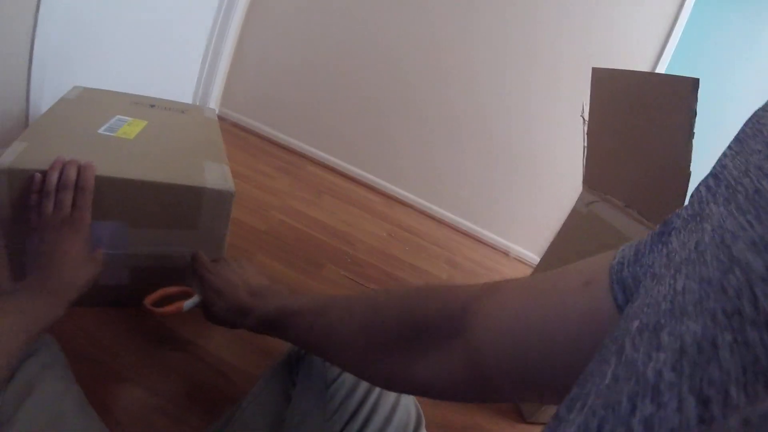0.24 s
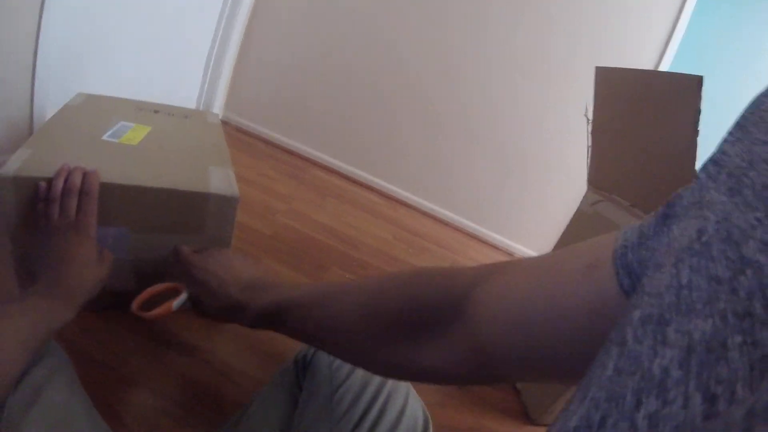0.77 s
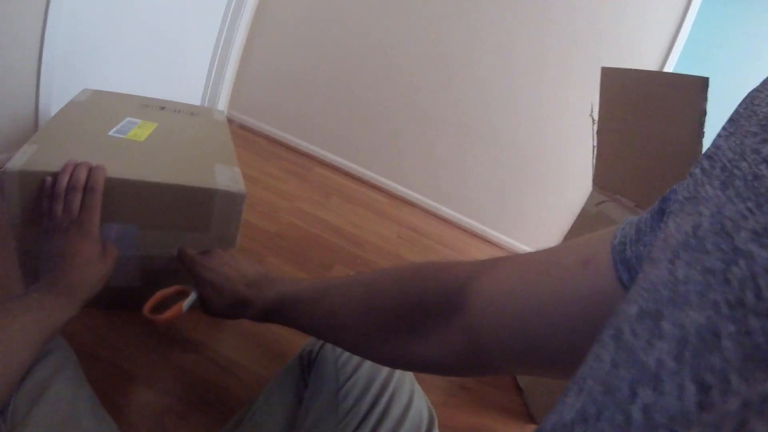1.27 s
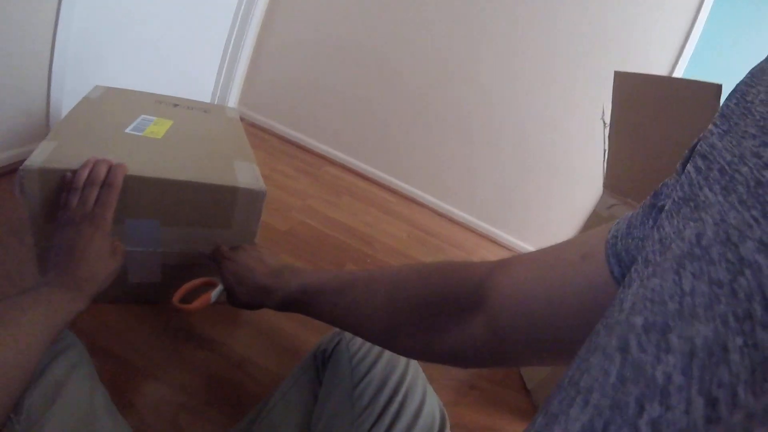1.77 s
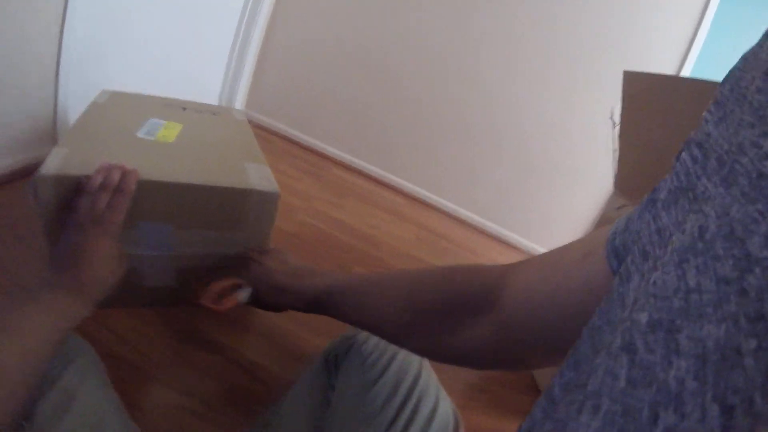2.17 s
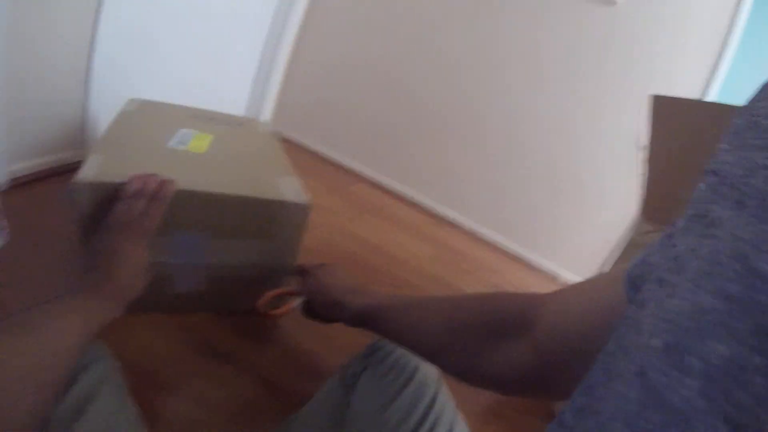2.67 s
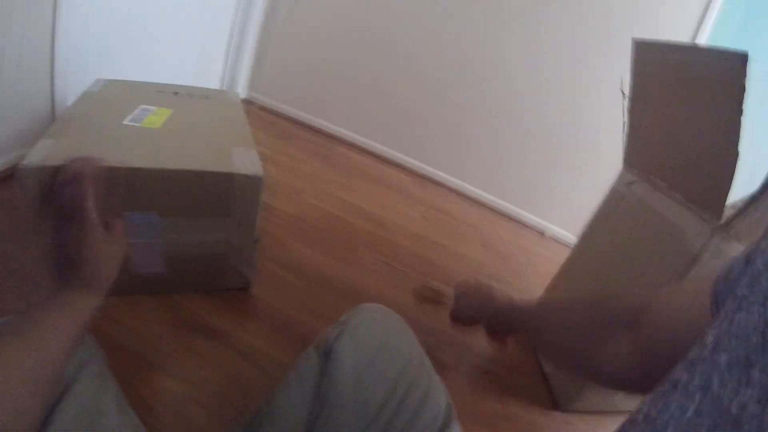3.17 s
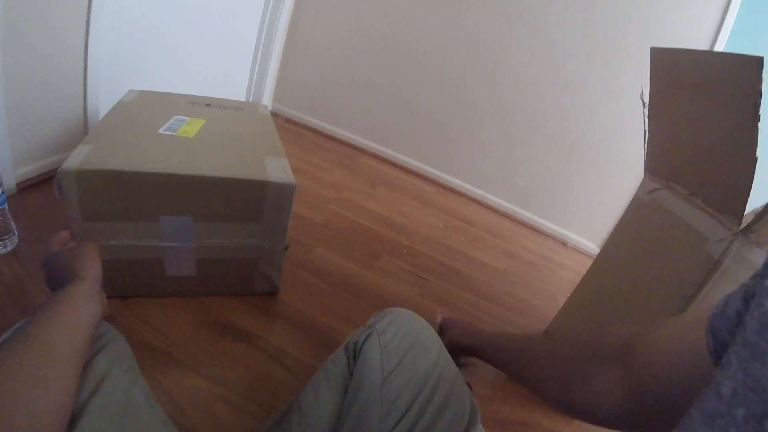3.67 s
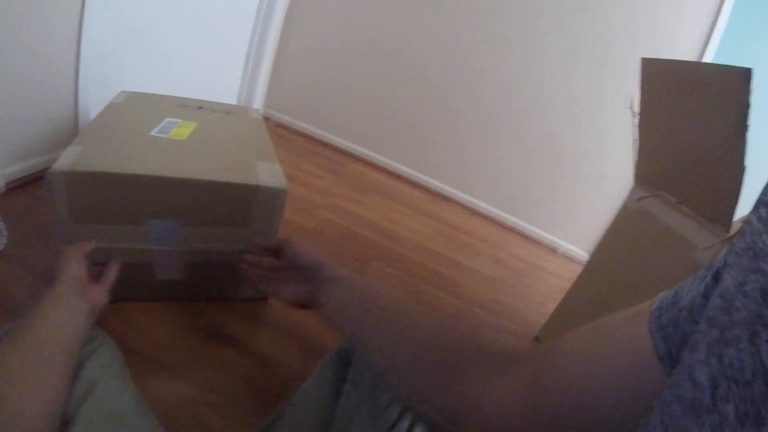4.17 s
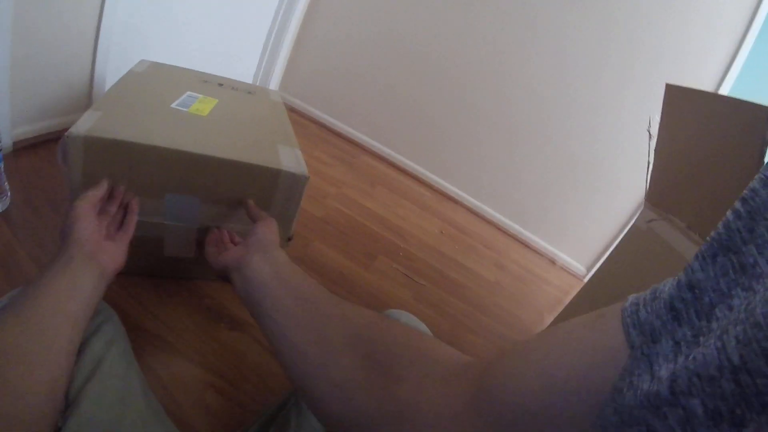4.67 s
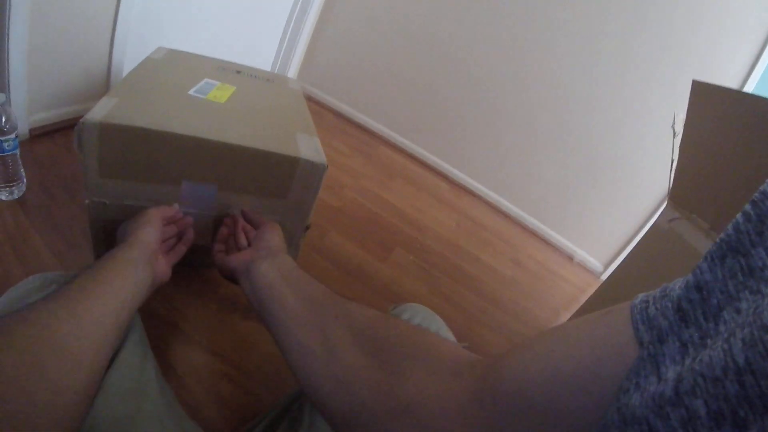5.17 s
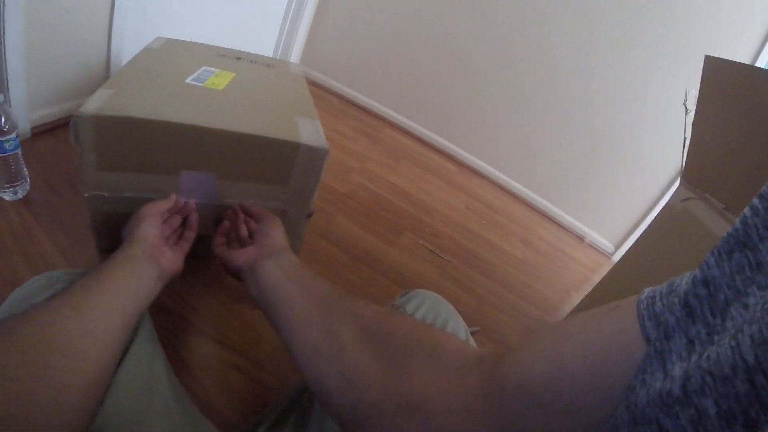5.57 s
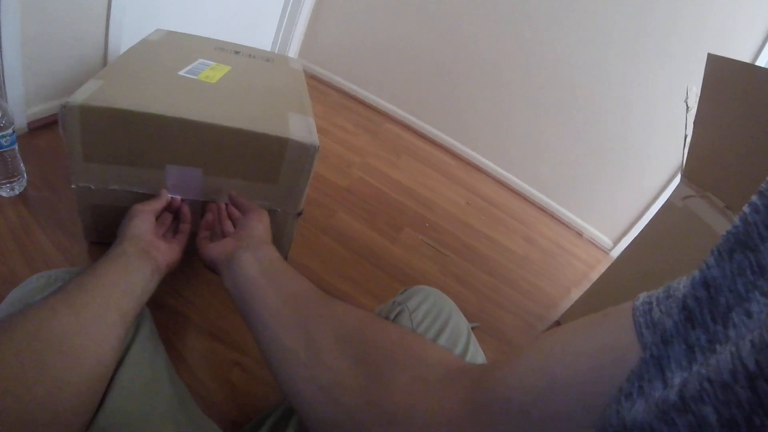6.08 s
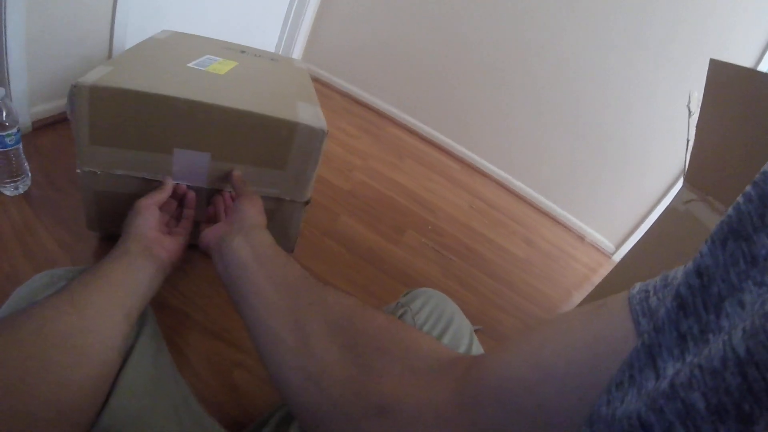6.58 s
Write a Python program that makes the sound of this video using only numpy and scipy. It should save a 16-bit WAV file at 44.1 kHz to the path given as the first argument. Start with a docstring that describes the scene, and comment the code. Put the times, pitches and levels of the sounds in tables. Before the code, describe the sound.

Scissors push along the packing tape of a cardboard box in short, rasping strokes, with sharp little cracks and dull bumps from the box. After a brief lull comes a louder knock and scrape as the scissors are put down and the hands shift. Fingers then rub and pick at the tape, which snaps in tiny tears. It sounds close, in a small, quiet room with a short echo.

```python
"""A small room with a wooden floor, where scissors are pushed along the packing tape of a cardboard box.
The blade sticks and slips, scraping and tearing the tape in short strokes while the box bumps.
Then the scissors are put down and fingers rub and pick at the tape, which snaps in bursts of tiny
tears, and the cardboard panels knock dully. Short room echoes and a quiet hush surround it all."""
import sys
import numpy as np
from scipy import signal
from scipy.fft import rfft, irfft
from scipy.io import wavfile

SR = 44100
rng = np.random.default_rng(int(sys.argv[2]) if len(sys.argv) > 2 else 0)


def unload_wav(signal):
    """Save mono or channel-first audio to the path in sys.argv[1] as 16-bit WAV at rate SR, clipped to [-1, 1]."""
    wavfile.write(
        sys.argv[1],
        SR,
        np.round(np.clip(np.atleast_2d(signal).T, -1, 1) * 32767).astype(np.int16),
    )


N = 301630


def from_db(db):
    """Decibels to gain."""
    return 10 ** (np.asarray(db) / 20)


def unit_rms(x):
    """Scale to unit power."""
    return x / np.sqrt(np.mean(x ** 2) + 1e-20)


def add(track, start_s, sound):
    """Mix a sound into a track at its cue."""
    at = int(np.clip(round(start_s * SR), 0, N - 1))
    track[at:at + len(sound)] += sound[:N - at]


def equalise(x, curve, size=8192):
    """Minimum-phase EQ that follows a curve of (Hz, dB) points."""
    hz, db = np.transpose(curve)
    grid = np.maximum(np.fft.rfftfreq(size, 1 / SR), 1)
    gain = from_db(np.interp(np.log(grid), np.log(hz), db))
    cepstrum = irfft(np.log(gain))
    cepstrum[1:size // 2] *= 2
    cepstrum[size // 2 + 1:] = 0
    impulse = irfft(np.exp(rfft(cepstrum)))
    return signal.fftconvolve(x, impulse)[:len(x)]


def resonate(x, hz, width_hz):
    """One resonant band with unity gain at its peak."""
    r = np.exp(-np.pi * width_hz / SR)
    feedback = [1, -2 * r * np.cos(2 * np.pi * hz / SR), r * r]
    return signal.lfilter(np.array([1, 0, -1]) * (1 - r * r) / 2, feedback, x + 1e-18)


def drift(turns_per_s):
    """A control signal of unit power that glides between random values."""
    position = np.arange(N) / SR * turns_per_s
    return unit_rms(np.interp(position, np.arange(N), rng.standard_normal(N)))


def decay(t, t60):
    """An exponential tail, 60 dB down after t60 seconds."""
    return np.exp(-np.log(1000) * t / t60)


# Tone of the quiet room and its hiss. Each row: frequency in Hz, gain in dB.
HUSH_EQ = [(20, 2), (45, 4), (110, -12.5), (380, -12), (520, -17), (800, -19), (1300, -25), (2200, -27.5),
           (4000, -35), (6000, -32.5), (7000, -26.5), (9000, -33), (11000, -37.5), (14500, -44)]


def hush(air_db=-52.5, waver_db=-1.5, hiss_db=-71, hiss_hz=6520, width_hz=450):
    """A bed of gently wavering room rumble and microphone hiss with one narrow, steep peak."""
    air = unit_rms(equalise(rng.standard_normal(N), HUSH_EQ))
    air *= from_db(waver_db * drift(turns_per_s=1.37))
    hiss = resonate(rng.standard_normal(N), hiss_hz, width_hz)
    hiss = resonate(hiss, hiss_hz, width_hz)  # a second pass steepens the peak
    return from_db(air_db) * air + from_db(hiss_db) * unit_rms(hiss)


# Resonances of taut tape and blade. Each row: frequency in Hz, width in Hz, gain in dB.
TAPE_RESONANCES = [(2150, 240, -13), (3650, 550, -3.5), (4730, 680, 0.5), (6360, 290, 2)]


def through_tape(x):
    """Tape and blade add their narrow resonances to whatever excites them."""
    return x + sum(from_db(db) * resonate(x, hz, width) for hz, width, db in TAPE_RESONANCES)


# Tape cracks and blade ticks. Each row: start in seconds, level in dB before the crack's trim,
# pitch in Hz, cardboard thud in dB against that level.
TAPE_SNAPS = [(0.2122, -46, 2420, -10), (1.0303, -44.5, 5700, 12), (1.222, -46.5, 4900, -12),
              (1.8432, -28, 5100, 1), (1.9775, -43.5, 6240, 1), (2.0211, -22.5, 6700, -34),
              (2.1756, -39.5, 5800, 7), (2.2089, -40, 2520, 11), (2.2388, -34.5, 6500, 6),
              (2.283, -24, 6340, -3), (2.5022, -36, 5070, 10.5), (2.5985, -17.5, 4830, -5),
              (2.865, -23, 4800, 0), (2.8719, -13.5, 5670, -22), (3.3615, -38.5, 4250, -17),
              (3.8806, -30, 4900, 1), (3.9065, -29, 6000, 4), (3.9377, -18, 1650, -1),
              (3.9447, -19, 4180, 3), (4.2233, -34.5, 3600, -8), (4.6387, -42, 2250, -4),
              (5.4758, -25, 5000, -1), (5.5388, -39.5, 5750, 1), (5.5439, -39, 5830, 5),
              (5.6177, -39, 2680, -6), (5.7379, -24.5, 6740, -2), (5.7449, -29.5, 7100, 1),
              (5.9446, -37.5, 5000, 1), (6.0977, -28, 4350, 2), (6.1782, -39, 2290, -9),
              (6.23, -27, 5700, -1.5), (6.2836, -37, 2280, -15), (6.321, -42, 4700, 3),
              (6.3416, -43, 4700, 5), (6.3595, -32, 5150, -1), (6.389, -18.5, 3530, -11),
              (6.7557, -21.5, 4330, -3), (6.7706, -28.5, 2460, 1), (6.7793, -29, 5700, 9.5)]
# Tone of a crack. Each row: frequency in Hz, gain in dB.
CRACK_EQ = [(250, 2), (600, 7.5), (1000, 10), (1550, -8.5), (2400, 7), (3500, -3.5), (4100, -2), (4800, 0),
            (6700, 0.5), (8700, -3.5), (11000, -19.5), (14500, -21)]


def tape_snaps(rise_s=0.00027, t60=0.012, width_hz=1800, broadband_db=-8, trim_db=-7,
               thud_hz=760, thud_t60=0.0063):
    """A snap is a burst of tiny tears lasting milliseconds; it also tugs the cardboard beneath."""
    cracks, thuds = np.zeros(N), np.zeros(N)
    t = np.arange(SR // 20) / SR
    attack = 1 - np.exp(-t / rise_s)
    envelope = attack * decay(t, t60)
    envelope /= envelope.max()
    thud = np.sin(2 * np.pi * thud_hz * t) * attack * decay(t, thud_t60)
    for start_s, db, hz, thud_db in TAPE_SNAPS:
        tears = rng.standard_normal(len(t)) * envelope
        burst = resonate(tears, hz, width_hz) + from_db(broadband_db) * tears
        crack = unit_rms(equalise(burst, CRACK_EQ)) * np.sqrt(np.mean(envelope ** 2))
        add(cracks, start_s, from_db(db) * crack)
        add(thuds, start_s, from_db(db + thud_db) * thud)
    return from_db(trim_db) * through_tape(cracks) + thuds


# Modes of the box panels. Each row: frequency in Hz, relative level in dB, T60 in seconds.
PANEL_MODES = [(80.3, -16.5, 0.18), (159, -52, 0.098), (209.8, -28.5, 0.19), (242.7, -26.5, 0.15),
               (429, -25.5, 0.18), (512, -33.5, 0.078), (667, -18.5, 0.08), (730, -54, 0.02),
               (1005, -42.5, 0.012)]


def box_ring(push, gain_db=-33):
    """The panels ring on after each push."""
    t = np.arange(SR // 4) / SR
    ring = sum(from_db(db) * np.sin(2 * np.pi * hz * t) * decay(t, t60) for hz, db, t60 in PANEL_MODES)
    return from_db(gain_db) * signal.fftconvolve(push, ring)[:N]


# Bumps of the cardboard. Each row: start in seconds, level in dB, pitch of the struck panel in Hz,
# crunch in dB against that level.
BOX_KNOCKS = [(0.213, -25.5, 410, -13), (0.342, -31.5, 387, -15), (0.756, -34.5, 390, 0),
              (0.765, -24.5, 350, -12), (0.788, -26, 337, -9), (0.819, -25.5, 830, -22),
              (0.823, -23, 328, -9), (1.032, -31, 254, -12.5), (1.208, -29.5, 383, -24),
              (1.406, -34.5, 228, -5), (1.842, -17, 244, 2), (1.848, -10.5, 448, -14),
              (2.022, -27, 320, -13), (2.028, -21, 350, -22), (2.24, -26, 400, -3),
              (2.283, -22.5, 417, 0.5), (2.643, -22, 262, -12), (2.871, -12, 246, -3),
              (3.36, -25, 353, -18), (3.379, -32, 240, -15), (3.728, -40, 232, -23),
              (3.881, -12.5, 614, -13), (3.885, -20, 162, 1), (3.903, -21.5, 432, -7),
              (3.939, -29.5, 200, -9), (4.007, -32, 170, -15), (4.314, -26.5, 233, -6),
              (4.42, -28.5, 400, -23), (4.485, -33, 435, -18), (4.542, -26.5, 236, -17),
              (4.638, -28.5, 437, -9), (4.665, -20.5, 415, -23), (4.691, -26.5, 454, -27),
              (4.718, -25, 225, -27), (4.79, -22.5, 380, -11), (4.833, -33, 250, -21),
              (5.844, -42, 402, -12), (6.179, -31.5, 412, -7), (6.284, -29, 660, -27),
              (6.409, -14.5, 440, -14), (6.588, -30.5, 474, -11), (6.66, -31.5, 376, -1.5),
              (6.755, -24, 420, -7)]
# Tone of paper flutes being crushed. Each row: frequency in Hz, gain in dB.
CRUNCH_EQ = [(100, -9.5), (240, -4.5), (600, 8.5), (900, 2), (1350, -25.5), (2500, -34), (6000, -35.5)]


def box_knocks(rise_cycles=0.33, t60_cycles=5.66, crunch_rise_s=0.0012, crunch_t60=0.036, low_cut_hz=45):
    """A panel gives way softly, swings briefly and shakes the whole box; its paper flutes crunch."""
    knocks = np.zeros(N)
    t = np.arange(SR // 10) / SR
    crush = decay(t, crunch_t60) * (1 - np.exp(-t / crunch_rise_s))
    for start_s, db, hz, crunch_db in BOX_KNOCKS:
        attack = 1 - np.exp(-t * hz / rise_cycles)
        swing = np.sin(2 * np.pi * hz * t) * attack * decay(t, t60_cycles / hz)
        swing /= np.abs(swing).max()
        fibres = rng.standard_normal(len(t)) * crush
        crunch = unit_rms(equalise(fibres, CRUNCH_EQ)) * np.sqrt(np.mean(crush ** 2))
        add(knocks, start_s, from_db(db) * (swing + from_db(crunch_db) * crunch))
    low_cut = signal.butter(2, low_cut_hz, "high", fs=SR, output="sos")
    return signal.sosfilt(low_cut, knocks + box_ring(knocks))  # the knocks carry no deep bass


def stroke_pressure(t, length_s, swell_db, rip_db, lift_t60, landing_s=0.0051, rip_width_s=0.0049):
    """The edge lands, bears down or eases off, ends on a rip (a dip if negative) and lifts away."""
    landing = np.minimum(t / landing_s, 1)
    swell = from_db(swell_db * np.minimum(t / length_s - 1, 0))
    rip = 1 + (from_db(rip_db) - 1) * np.exp(-((t - length_s) / rip_width_s) ** 2 / 2)
    lift = decay(np.maximum(t - length_s, 0), lift_t60)
    return landing * swell * rip * lift


# The blade feels along the seam and cuts from 1.8 s; from 3.1 s the hands shift and put the scissors
# down; from 4.2 s fingers rub the tape. Each row: start in seconds, length in seconds, rasp and rumble
# in dB at the stroke's end (before rip and trim), swell in dB, closing rip in dB, tape resonance in Hz.
SCRAPE_STROKES = [(0.268, 0.083, -53.5, -41, 1.5, 0, 7400), (0.44, 0.052, -50.5, -43, -1.5, 0.5, 7560),
                  (0.696, 0.12, -47, -38, 6.5, -0.5, 5300), (1.4, 0.03, -57.5, -42.5, -0.5, -1, 5670),
                  (1.793, 0.056, -54.5, -36.5, 7.5, 17, 5100), (2.008, 0.062, -51, -43, -7.5, 3.5, 6100),
                  (2.225, 0.11, -40, -30.5, 13.5, 4.5, 5440), (2.521, 0.074, -52.5, -45.5, -10.5, 1, 5170),
                  (2.596, 0.044, -39, -36.5, -2.5, 6, 5500), (2.756, 0.12, -35, -33, 6, 11.5, 5360),
                  (3.098, 0.24, -60, -56, 6, -3, 6400), (3.741, 0.028, -60.5, -54.5, 13, 5, 5000),
                  (3.84, 0.066, -64, -45.5, 2.5, 16, 3000), (3.899, 0.044, -38.5, -29.5, 4, 5, 1510),
                  (3.946, 0.087, -55, -44, -12.5, 0, 1700), (4.22, 0.087, -53, -41.5, -3, 7.5, 3620),
                  (4.38, 0.061, -53, -40.5, 8.5, -6, 3420), (4.485, 0.066, -54, -39, 4.5, -6, 3320),
                  (4.647, 0.22, -56, -45, -1, -3.5, 4930), (4.861, 0.36, -70, -59, -6.5, 8, 5150),
                  (5.926, 0.026, -54.5, -43, 0, -0.5, 5870), (6.036, 0.361, -61, -54.5, 4.5, 24.5, 6400)]
# Tone of the tape's bright rasp. Each row: frequency in Hz, gain in dB.
RASP_EQ = [(600, 8), (1000, -27), (1650, 2), (2400, 4), (3100, 3), (3900, -2.5), (4700, -2.5), (6500, 1.5),
           (7100, -2.5), (9400, -7.5), (11000, -14), (14000, -33.5)]
# Tone of the cardboard's dull rumble. Each row: frequency in Hz, gain in dB.
RUMBLE_EQ = [(45, -21.5), (80, 4), (125, -2), (200, 6.5), (420, 7.5), (620, -2.5), (1000, -6),
             (1400, -13.5), (2500, -41)]


def scrapes(slips_per_s=3500, spread_db=3.0, rub_gain=0.6, catch_db=2.73, catches_per_s=170,
            trim_db=-3.5, squeak_width_hz=1900, lift_t60=0.083):
    """Blade or finger sticks and slips: uneven clicks rasp in the tape and rumble in the box."""
    sizes = from_db(spread_db * np.minimum(rng.exponential(1, N), 4)) * rng.choice([-1, 1], N)
    slips = unit_rms(sizes * (rng.random(N) < slips_per_s / SR))
    friction = slips + rub_gain * rng.standard_normal(N)
    friction *= from_db(catch_db * drift(catches_per_s))  # the edge catches on fibres and flutes
    bright = unit_rms(through_tape(equalise(friction, RASP_EQ)))
    dull = unit_rms(equalise(friction, RUMBLE_EQ))
    rasp, rumble = np.zeros(N), np.zeros(N)
    for start_s, length_s, rasp_db, rumble_db, swell_db, rip_db, hz in SCRAPE_STROKES:
        span = np.arange(int(start_s * SR), min(int((start_s + length_s + lift_t60) * SR), N))
        pressure = stroke_pressure((span - span[0]) / SR, length_s, swell_db, rip_db, lift_t60)
        squeak = resonate(bright[span], hz, squeak_width_hz)
        rasp[span] += from_db(rasp_db) * pressure * (bright[span] + squeak)
        rumble[span] += from_db(rumble_db) * pressure * dull[span]
    return from_db(trim_db) * (rasp + rumble + box_ring(rumble))


# Tone of the room's reverb. Each row: frequency in Hz, gain in dB.
REVERB_EQ = [(60, 6.5), (150, -3), (400, -2), (1000, 2), (2500, 0), (6500, -1.5), (9000, 1.5), (14000, -28)]


def room_reverb(send, build_s=0.0004, t60=0.31):
    """Dense reflections from floor and walls; their pattern shifts as hands and microphone move."""
    wet, hop = np.zeros(N), SR // 6
    t = np.arange(SR // 3) / SR
    tail = decay(t, t60) * (1 - np.exp(-t / build_s))
    for middle in range(0, N + hop, hop):
        span = np.arange(max(middle - hop, 0), min(middle + hop, N))
        echoes = rng.standard_normal(len(t)) * tail / np.linalg.norm(tail)
        crossfade = np.cos(np.pi / 2 * (span - middle) / hop)
        add(wet, span[0] / SR, signal.fftconvolve(send[span] * crossfade, echoes))
    return equalise(wet, REVERB_EQ)


def scene(knock_send_db=-10, snap_send_db=-5.5, scrape_send_db=-5):
    """A mono mix of box, tape and blade, each with its own reverb send, over the hush."""
    knocks, snaps, scraping = box_knocks(), tape_snaps(), scrapes()
    send = from_db(knock_send_db) * knocks + from_db(snap_send_db) * snaps
    send += from_db(scrape_send_db) * scraping
    return (knocks + snaps + scraping + room_reverb(send) + hush())[None]


def record(dry, high_cut_hz=14500):
    """A steep high cut takes the very top off the mix."""
    return signal.sosfilt(signal.ellip(10, .1, 80, high_cut_hz, fs=SR, output="sos"), dry)


dry = scene()
out = record(dry)
unload_wav(out)
```